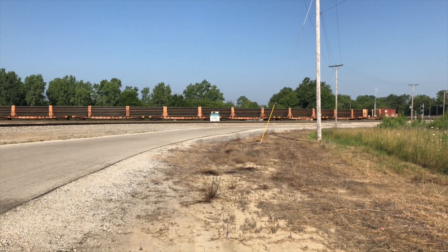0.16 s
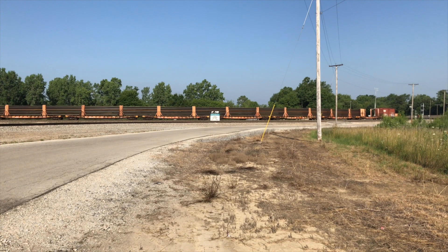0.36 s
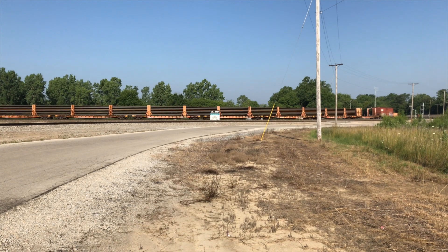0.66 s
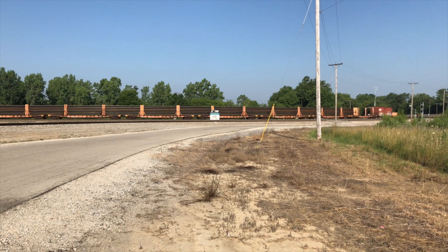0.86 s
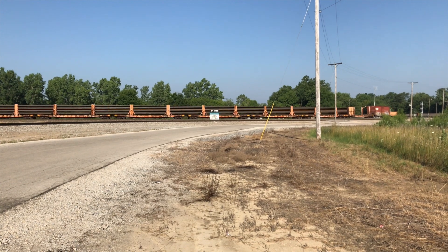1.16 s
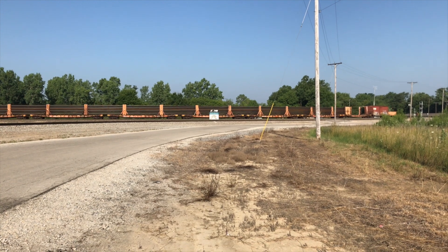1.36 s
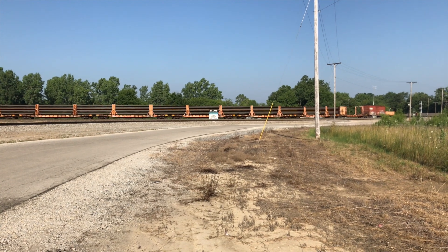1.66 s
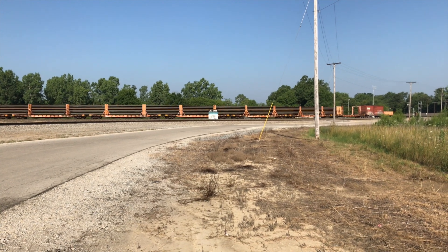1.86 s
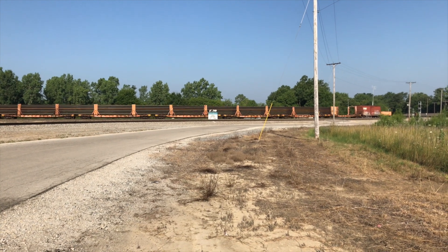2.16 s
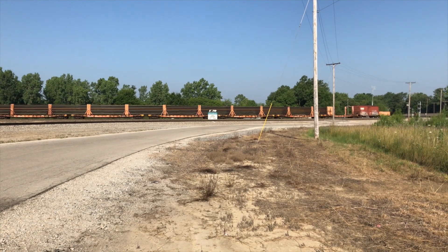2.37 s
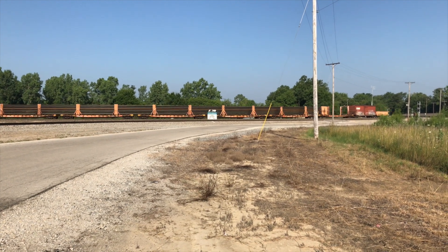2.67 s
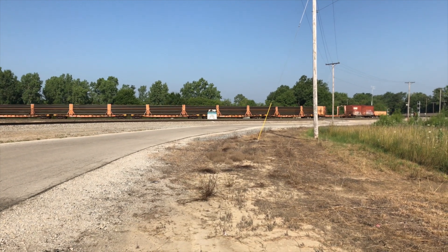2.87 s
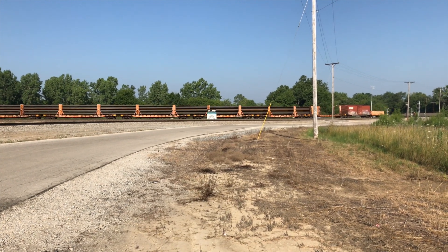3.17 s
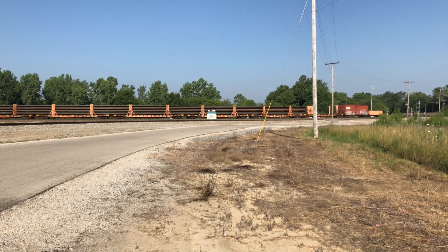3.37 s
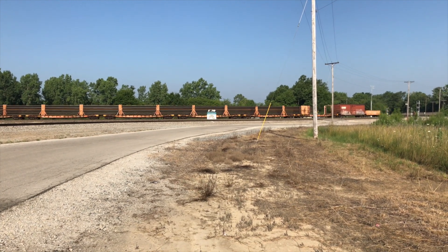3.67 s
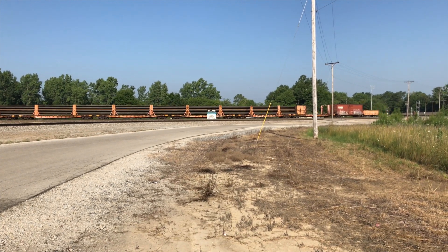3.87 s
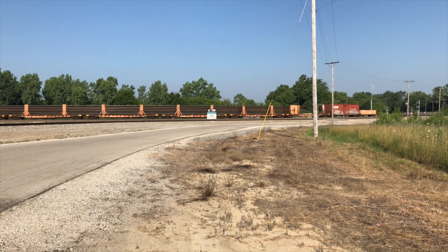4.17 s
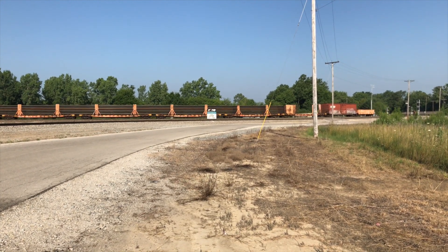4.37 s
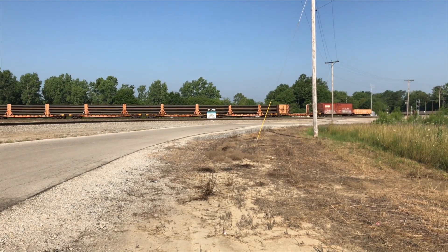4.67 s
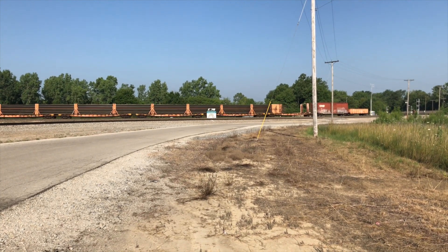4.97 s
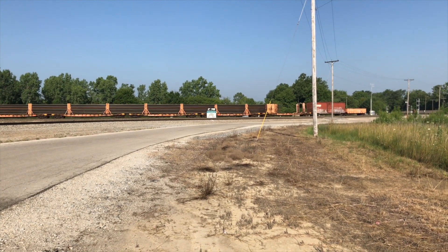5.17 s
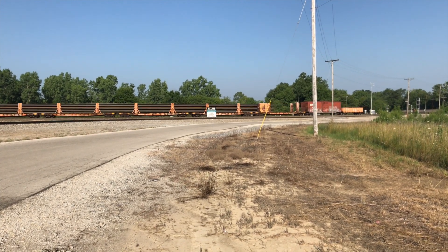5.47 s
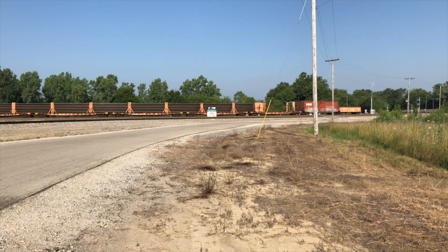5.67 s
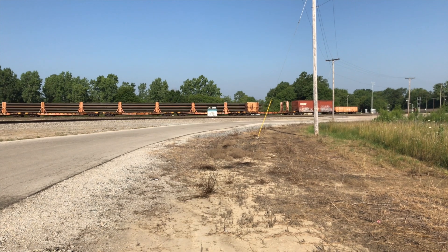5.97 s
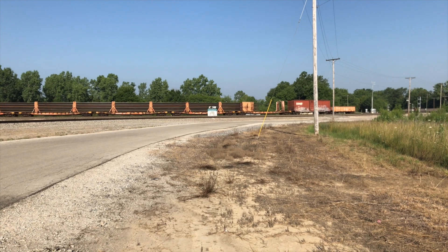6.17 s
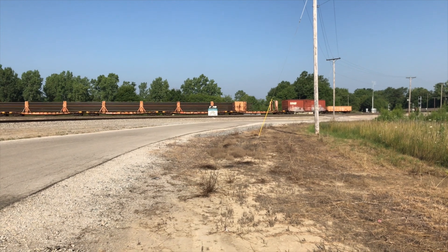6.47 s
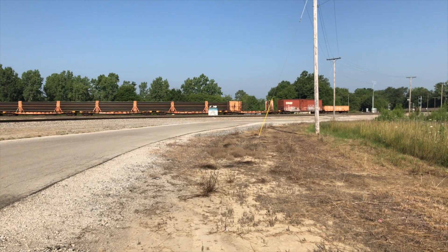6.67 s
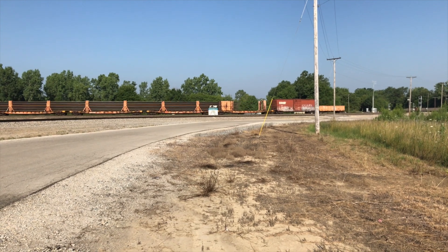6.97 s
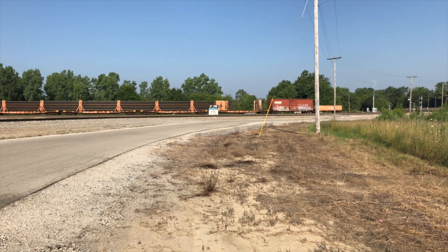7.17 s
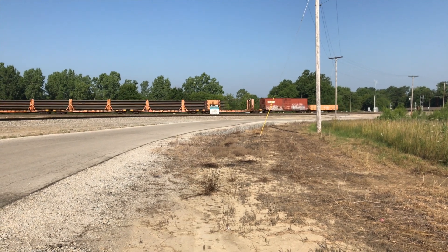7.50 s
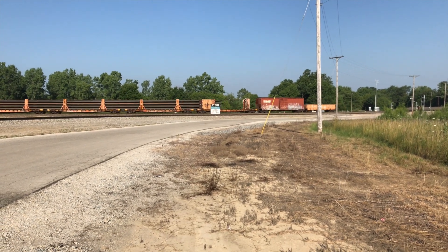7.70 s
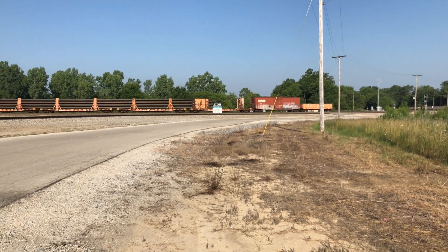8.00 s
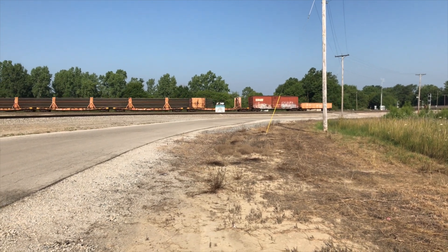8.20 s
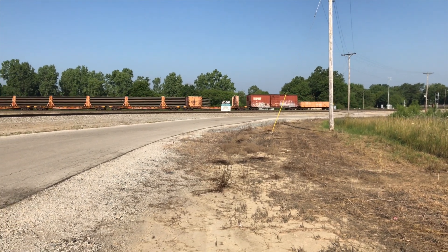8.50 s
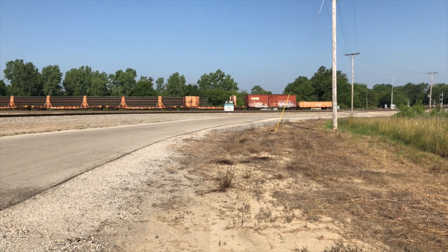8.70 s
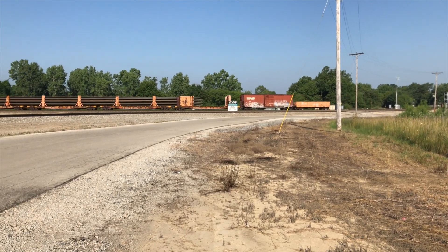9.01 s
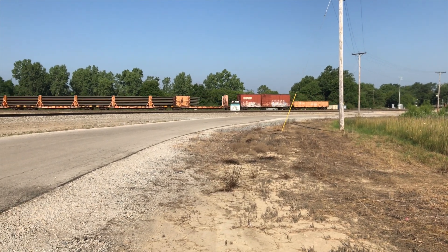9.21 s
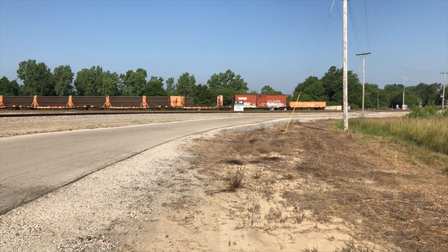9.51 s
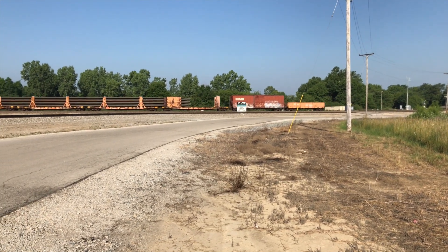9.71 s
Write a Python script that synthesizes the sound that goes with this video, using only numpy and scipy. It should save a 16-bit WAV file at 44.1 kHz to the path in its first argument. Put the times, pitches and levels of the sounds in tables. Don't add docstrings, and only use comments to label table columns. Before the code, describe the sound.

Outdoors beside a road, a phone hears a long freight train some hundred metres away. A steady deep rumble underlies a bright rubbing hiss. Chattering creaks open the scene, then a short multi-note shriek, then long pure wheel squeals near two, three and five kilohertz that swell, slip and overlap, growing strongest late. The sound is the same on both sides, with little echo.

```python
import sys
import numpy as np
from scipy import signal
from scipy.fft import rfft, irfft, next_fast_len
from scipy.io import wavfile
from scipy.ndimage import uniform_filter1d

SR = 44100
rng = np.random.default_rng(int(sys.argv[2]) if len(sys.argv) > 2 else 0)


def volts_from_db(level):
    exponent = np.asarray(level, float) / 20
    return 10 ** exponent


def dump_mix(stems):
    frames = np.atleast_2d(stems).T
    limited = np.clip(frames, -1, 1)
    pcm = np.round(limited * 32767).astype(np.int16)
    wavfile.write(sys.argv[1], SR, pcm)


N = 434371
STEP = 64

# time_s, level_db
ROLL_LOAD = [(0, -35.5), (1.2, -33.5), (3, -34.5), (4.5, -35.5), (6.2, -35), (8, -36), (9.85, -37.5)]
# pitch_hz, level_db (per Hz)
RUMBLE_COLOUR = [(12, -51), (20, -27.5), (69, -1), (87, 2.5), (218, -14), (375, -31.5), (434, -27),
                 (471, -29), (686, -29), (808, -40.5), (1000, -25.5), (1300, -63), (2200, -120)]
BOGIE_HZ, BOGIE_DB, BOGIE_S, BOGIE_SPREAD_S = 278, 5.5, 9.5, 2.3

# time_s, rub_db, scrape_db
RUB = [(0.0, -33, -46), (.74, -33.5, -44), (1.23, -39, -44), (1.53, -41.5, -43), (1.75, -38.5, -40),
       (2.14, -35, -42.5), (2.6, -38, -39), (3.1, -39, -38.5), (3.81, -43, -34.5), (4.65, -39.5, -36),
       (4.94, -43, -35), (5.51, -40, -34.5), (6.28, -40.5, -32.5), (8.89, -51.5, -32.5), (9.19, -56, -31.5),
       (9.85, -50, -32)]
RUB_HZ = [1400, 3500, 10000]
RUB_SHARE = [0.51, 0.85, 0.15]
RUB_DRIFT = [0.3, 0.55, 0.22]
# pitch_hz, level_db (per Hz)
HISS_COLOUR = [(700, -36), (1100, -29.5), (1790, -21.5), (2400, -19), (3400, -23), (4600, -23), (6500, -24),
               (10200, -26.5), (12500, -33), (15600, -41)]
# pitch_hz, width_hz, level_db (per Hz), growth_db (per s)
WHEEL_MODES = [(1107, 64, -29, -1), (1304, 54, -31.5, -1.5), (1663, 110, -27, -0.6), (1931, 40, -13.5, .3),
               (1988, 54, -10, 0.35), (2045, 65, -17, 0.5), (2240, 63, -23, -2.5), (2958, 64, -11, 0),
               (3156, 130, -17.5, -1), (3475, 115, -24.5, -1.1), (3952, 170, -19, -0.3),
               (5106, 214, -15, 1), (6910, 200, -26.5, -0.1), (7940, 160, -27, 0.7), (8780, 200, -26, 0),
               (9440, 200, -24, 0.6), (11020, 520, -28, 0), (11570, 134, -20, 0.65),
               (12000, 270, -27.5, -1), (13050, 700, -29.5, -0.6), (14300, 800, -36, 0),
               (15300, 250, -40, -1), (15500, 500, -37, 0)]
# time_s, change_db
TRIO_RUB = [(0, -2), (1.4, -7), (3, 0), (8.85, 0), (9.15, -9)]
# pitch_hz, width_hz, level_db (per Hz)
FLANGE_MODES = [(5388, 270, -16), (5435, 90, -17), (5740, 120, -20), (5600, 70, -21), (5930, 90, -18),
                (6176, 116, -23)]
HISS_DB, WHEEL_DB, FLANGE_DB = -38, -35.5, -38.5
BOUT_HISS_DB = 2

# pitch_hz, scatter_hz
CHATTER_HZ = [(2163, 13), (2256, 7), (1980, 12)]
# start_s, length_s, level_db
CHATTER = [
    [(0.0, 0.025, -32.5), (.07, 0.033, -32.5), (.17, 0.081, -37), (.24, 0.14, -39), (.34, 0.016, -24.5),
     (.4, .06, -36), (.46, 0.058, -40), (.56, 0.056, -34), (.657, 0.041, -28), (.7, 0.033, -26),
     (.745, 0.07, -34), (.83, 0.048, -33), (.875, 0.069, -30.5), (.97, 0.044, -34), (1.04, 0.048, -37),
     (1.17, .1, -50)],
    [(3.02, 0.025, -30), (3.065, 0.048, -34), (3.11, 0.032, -34.5), (3.28, 0.068, -35), (3.39, 0.032, -31),
     (3.435, .055, -35), (3.515, 0.04, -35), (3.575, .025, -34), (3.62, 0.05, -33), (3.665, .04, -34),
     (3.8, 0.055, -44), (3.91, .06, -41)],
    [(9.66, 0.013, -34), (9.7, 0.016, -38), (9.76, 0.027, -28.5), (9.815, 0.021, -25.5)],
]
# start_s, length_s, pitch_hz, level_db
CREAKS = [(.29, .03, 2240, -37), (.315, .03, 2290, -31), (.42, .12, 2935, -41), (1.15, .08, 3210, -43),
          (.53, .07, 1290, -46), (1.6, .06, 1660, -46), (1.72, .1, 500, -53), (2.7, .06, 3110, -45),
          (3.221, .024, 3105, -25.5), (3.255, .04, 3104, -28.5), (3.305, .04, 3104, -40),
          (9.59, .03, 3480, -44), (9.6, .03, 2600, -48), (.035, .03, 2310, -40), (.12, .025, 2300, -41),
          (.205, .02, 2260, -38), (.55, .03, 2250, -40), (1.06, .04, 2260, -39), (1.14, .03, 2260, -40),
          (1.24, .03, 2110, -39), (1.24, .05, 3925, -39), (4.25, .1, 3610, -49), (4.08, .14, 3550, -48),
          (4.25, .15, 3480, -49), (2.03, .05, 3530, -46), (8.9, .72, 440, -53), (2.15, .05, 3190, -44),
          (5.97, .32, 2250, -42), (7.23, .05, 1520, -46), (6.68, .05, 1700, -48), (6.67, .03, 1610, -48),
          (5.53, .05, 2860, -42), (4.7, .07, 1815, -41), (4.84, .05, 1830, -42), (5.73, .04, 5840, -38),
          (6.17, .06, 1815, -45)]
SAG_PER_S = .012

# start_s, length_s, pitch_hz, level_db
CRIES = [(0, 1.0, 3910, -48), (2.2, .5, 3950, -49), (2.6, 1.6, 3985, -48), (4.9, .7, 3950, -50),
         (0, .35, 2960, -45), (3.8, .9, 6880, -50), (3.1, .25, 9250, -48), (5.0, 1.4, 9480, -49),
         (6.3, .7, 9570, -48), (3.4, 2.0, 10900, -51), (4.1, 1.2, 12180, -50), (7.2, .7, 3975, -50),
         (2.04, .34, 7810, -40), (5.3, 1.2, 1935, -46), (4.4, .8, 1915, -47), (1.58, .2, 6010, -47),
         (2.45, .14, 5550, -45), (.23, .26, 7311, -49), (.84, .39, 9445, -50), (.88, .23, 11155, -49),
         (1.1, .8, 3895, -49), (2.79, .28, 9489, -46), (3.0, .42, 8784, -46), (3.0, .53, 12129, -52),
         (4.2, .5, 13350, -57), (4.71, .7, 2851, -49), (4.9, .55, 14450, -60), (5.32, .28, 6841, -41),
         (5.41, .3, 6900, -42), (5.7, .25, 6780, -47), (7.05, .7, 1700, -53), (6.2, .6, 6889, -42),
         (6.7, .9, 5990, -47), (7.59, 1.11, 9498, -47), (7.8, .55, 14310, -54), (6.6, .4, 14360, -56),
         (7.6, .7, 15300, -60), (8.13, .46, 1700, -53), (8.48, .39, 11146, -50), (8.66, 1.07, 1670, -55),
         (8.8, .85, 9291, -42), (9.3, .35, 3870, -51), (9.62, .35, 3860, -46), (8.5, .5, 3910, -51),
         (8.05, .38, 5910, -43), (7.25, .2, 5920, -44), (8.4, .12, 5790, -45), (9.02, .1, 5660, -44),
         (9.68, .12, 5620, -43), (4.5, .2, 6150, -48), (8.94, .44, 11997, -52), (9.17, .44, 10639, -54),
         (9.17, .7, 9525, -45),
         (1.75, .7, 8795, -47), (2.45, .4, 7800, -47), (2.68, .36, 8790, -44), (2.85, .25, 9700, -46),
             (4.0, .5, 9650, -51), (5.05, .9, 6800, -49), (5.1, .3, 6910, -47), (5.4, .8, 9630, -50),
             (5.52, .12, 8260, -47), (5.64, .14, 8880, -45), (6.2, .7, 9400, -48), (6.68, .35, 8890, -44),
             (7.75, .6, 7960, -49), (8.05, .5, 9500, -47), (7.1, .5, 6880, -50), (9.3, .5, 7100, -52),
             (6.4, .12, 5420, -40), (7.85, .15, 5440, -40)]
UPPER_HZ = [5951, 7753, 8770, 12315]
# start_s, length_s, level_db
UPPER_CRIES = [
    [(5.13, 0.44, -42), (6.05, 0.28, -44), (7.0, .3, -49)],
    [(1.83, 2.4, -53), (4.1, 0.59, -46), (4.5, .45, -41), (5.36, 0.46, -44), (5.66, .6, -40),
     (6.2, 0.4, -42), (7.76, 0.56, -49), (8.48, 0.44, -44)],
    [(3.74, 0.41, -45), (4.64, 0.34, -46), (5.06, 0.67, -41.5), (5.76, 0.92, -40.5), (7.48, 0.28, -45),
     (8.45, 0.74, -45)],
    [(4.85, 0.67, -52), (7.27, .51, -46), (8.45, 0.83, -49)],
]
SHRIEK_HZ = [5383, 6283, 7270, 8085, 8288, 8797, 9100, 9703, 9973, 10306, 10922, 11189, 12134]
SHRIEK_DB = [-55, -45, -52, -50, -46, -43, -44, -41, -42, -47, -41, -37, -43]
# start_s, length_s, level_db, tilt_db (per kHz)
BOUTS = [
    (1.68, 0.37, -2, -0.27),
    (2.029, 0.27, -9, -1.3),
    (2.72, 0.37, -7.5, -0.97),
]
SINK_PER_S, NEAR_SINK_PER_S = 0.00207, .0026

# time_s, low_hz, middle_hz, high_hz
SINGING_PITCH = [(0, 1997, 5168, 11805), (2.5, 2002, 5171, 11773), (4.5, 1999, 5166, 11708),
                 (6.5, 1993, 5154, 11663), (8.5, 1986, 5140, 11586), (9.85, 1982, 5128, 11550)]
# time_s, level_db
LOW_SING = [(0.0, -48), (.72, -37.5), (1.45, -58), (1.62, -37.5), (2.3, -37), (2.66, -28.5), (3.55, -34.5),
            (3.93, -30.5), (4.85, -31.5), (5.5, -33), (6.7, -29), (7.37, -36), (7.395, -25.5), (8.04, -21),
            (8.42, -25.5), (9.28, -20.5), (9.62, -24), (9.66, -38)]
# time_s, loss_db
SLIPS = [(3.28, 8.6), (3.72, 6.9), (4.32, 7.1), (4.45, 5.1), (5.22, 4.3), (5.32, 8.6), (5.45, 15),
         (5.66, 2.8), (6.12, 5.8), (6.2, 5.2), (6.43, 2.2), (6.83, 2), (7.24, 6), (8.89, 2.1), (9.575, 2.8),
         (.52, 6), (2.08, 6.1), (3.06, 2.3), (6.65, 2.5), (7.7, 3)]
SLIP_S = 0.055
# start_s, length_s, level_db
MIDDLE_GRIPS = [(0.145, 0.22, -37), (.92, 0.45, -43), (1.638, 0.37, -34), (2.005, 0.5, -35),
                (2.594, 0.33, -39.5), (3.04, 0.6, -32.5), (3.66, 0.39, -33.5), (4.05, .17, -31),
                (4.3, .12, -32), (4.36, .13, -29.5), (4.515, 0.12, -28.5), (4.713, 0.24, -35),
                (4.99, 0.78, -34), (5.85, 0.24, -36), (6.05, 0.3, -30.5), (6.385, 0.45, -34),
                (6.647, 0.49, -31), (7.193, 0.46, -34.5), (7.785, 0.19, -26.5), (8.021, 0.24, -29.5),
                (8.304, 0.24, -27), (8.562, 0.47, -35.5), (9.003, 0.23, -28.5), (9.266, 0.27, -27.5),
                (9.633, 0.22, -30)]
# start_s, length_s, level_db
HIGH_GRIPS = [(.69, .05, -42), (.92, .13, -41), (1.08, .5, -45), (1.74, .24, -40), (2.08, .2, -45),
              (2.6, .5, -55), (3.2, .3, -46), (3.55, .3, -45), (3.87, 0.13, -38), (3.99, 0.096, -34),
              (4.27, 0.19, -41), (4.46, .24, -42.5), (4.75, .08, -34), (4.88, .24, -44), (5.3, .3, -50),
              (5.95, 0.15, -39), (6.1, .14, -55), (6.6, 0.14, -43), (6.84, .2, -44), (7.17, 0.092, -42),
              (7.25, .1, -38), (7.4, .14, -50), (7.62, 0.18, -51.5), (7.86, 0.16, -46), (8.22, .3, -48),
              (8.7, .07, -40), (8.78, .2, -36.5), (8.99, .1, -36), (9.15, .13, -38), (9.46, .12, -40),
              (9.66, 0.22, -41.5)]
# start_s, length_s, level_db
LEAVING_GRIPS = [
    (-.1, 0.49, -43.5),
    (0.417, 0.51, -39),
]
LEAVING_HZ = 5040
BUILD_S, LET_GO_S, HIGH_EDGE_S = 0.2, 0.24, .05
HUM_DB = -11

TRIO_HZ = [2909.5, 2894.5, 2940.5]
# start_s, length_s, level_db
TRIO_GRIPS = [
    [(2.62, 0.51, -38.5), (3.31, 0.48, -32), (3.74, 0.25, -29), (4.1, 0.16, -29.5), (4.3, 0.44, -34.5),
     (4.8, 0.5, -31.5), (5.62, 0.43, -35.5), (6.22, 0.43, -33.5), (6.82, 0.44, -35.5), (7.4, 0.38, -36.5),
     (7.72, .33, -38)],
    [(5.95, .75, -34), (6.7, 0.35, -36.5), (7.55, 0.52, -37.5), (8.0, 0.47, -37.5)],
    [(7.08, 0.63, -37.5), (7.95, 0.48, -41.5), (8.6, 0.39, -34)],
]


def curves(table, t):
    s, *columns = np.transpose(table)
    return [np.interp(t, s, column) for column in columns]


def walk(rate, size, per_s=SR):
    hold = max(int(per_s / rate), 1)
    steps = np.repeat(rng.standard_normal(size // hold + 1), hold)
    return 1.3 * uniform_filter1d(uniform_filter1d(steps, hold), hold)[:size]


def tone(hz, rough, rate, wander_hz):
    size = len(hz)
    wandering = hz + wander_hz * walk(12, size)
    phase = 2 * np.pi * (np.cumsum(wandering) / SR + rng.random())
    share = np.clip(rough, 0, 1)
    flutter = walk(rate, size) * np.sin(phase) + walk(rate, size) * np.cos(phase)
    return np.sqrt(2 - 2 * share) * np.sin(phase) + np.sqrt(share) * flutter


def bands(gain, centres):
    size = next_fast_len(N)
    hz = np.arange(1, size // 2 + 2) * SR / size
    spectrum = rfft(rng.standard_normal(size)) * gain(hz)
    spectrum /= np.std(irfft(spectrum, size))
    place = np.interp(np.log(hz), np.log(centres), np.arange(len(centres)))
    return [irfft(spectrum * np.clip(1 - abs(place - k), 0, 1), size)[:N] for k in range(len(centres))]


def colour(points, hz):
    point_hz, db = np.transpose(points)
    return volts_from_db(np.interp(np.log(hz), np.log(point_hz), db))


def peak(hz, centre_hz, width_hz, db):
    return volts_from_db(db) ** 2 / (1 + (2 * (hz - centre_hz) / width_hz) ** 4)


def drifting(band, db, slow_db, slow_rate, quick_db, quick_rate):
    drift = slow_db * walk(slow_rate, len(db), SR / STEP)
    flicker = quick_db * walk(quick_rate, len(db), SR / STEP)
    return band * np.repeat(volts_from_db(db + drift + flicker), STEP)[:N]


def grip(t, rows, build_s=BUILD_S, let_go_s=LET_GO_S):
    slow, gain = t[::STEP], 0
    for start, length, db in rows:
        since, left = slow - start, start + length - slow
        edge = np.minimum(since / build_s + 0.41, left / let_go_s + 0.52)
        held = np.sin(np.pi / 2 * np.clip(edge, 0, 1)) ** 2
        hum = volts_from_db(HUM_DB) * np.clip(1 + 4 * np.minimum(since, left), 0, 1)
        gain = np.maximum(gain, volts_from_db(db) * np.maximum(held, hum))
    return np.interp(t, slow, gain)


def sunk(hz, s):
    return hz * (1 - NEAR_SINK_PER_S * (s - 6))


def cries(t, table, rough):
    out = np.zeros(N)
    for start, length, hz, db in table:
        on = slice(int(start * SR), int((start + length) * SR))
        slide = hz * (1 - SINK_PER_S * (t[on] - start - length / 2))
        swell = signal.windows.tukey(len(slide), .55)
        out[on] += swell * volts_from_db(db) * tone(slide, rough, rate=45, wander_hz=0.0011 * hz)
    return out


def rumble(t):
    slow = t[::STEP]
    centres = np.geomspace(30, 1000, num=10)
    db, = curves(ROLL_LOAD, slow)
    out = 0
    for hz, band in zip(centres, bands(lambda f: colour(RUMBLE_COLOUR, f), centres)):
        follow = np.clip(110 / hz, 0, 1)
        pitch_gap = np.log(hz / BOGIE_HZ) ** 2 / 0.14
        time_gap = ((slow - BOGIE_S) / BOGIE_SPREAD_S) ** 2
        near_db = BOGIE_DB * np.exp(-pitch_gap - time_gap)
        out = out + drifting(band, db.mean() + follow * (db - db.mean()) + near_db, .5, .8, .5, 4)
    return out


def crowd(t, gain, scrape_db, count):
    when, long, where, size = rng.random((count, 4)).T
    hz = np.where(np.arange(count) % 2, 5280 + 950 * where ** 1.5, 6500 + 9000 * where)
    start = when * (t[-1] - .1)
    scrape = scrape_db[(start * SR / STEP).astype(int)]
    db = 20 * np.log10(gain(hz)) + (scrape - 6) * (hz < 6400) + 5 * size - 31
    return cries(t, zip(start, .08 + .3 * long ** 2, hz, db), rough=.85)


def friction(t):
    slow = t[::STEP]
    middle = slow - slow.mean()
    rub_db, scrape_db = (db - db.mean() for db in curves(RUB, slow))
    change = [share * rub_db + drift * middle for share, drift in zip(RUB_SHARE, RUB_DRIFT)]
    bouts = sum(np.exp(-(2 * (slow - start) / length - 1) ** 2) for start, length, *_ in BOUTS)
    change[-1] += BOUT_HISS_DB * bouts

    def wheels(hz):
        return sum(peak(hz, *mode[:3]) for mode in WHEEL_MODES)

    def flange(hz):
        return sum(peak(hz, *mode) for mode in FLANGE_MODES)

    centres = np.geomspace(900, 15000, num=13)
    out, shared = 0, walk(12, len(slow), SR / STEP)
    for hz, band in zip(centres, bands(lambda f: colour(HISS_COLOUR, f), centres)):
        share = [np.interp(np.log(hz), np.log(RUB_HZ), row) for row in np.eye(len(RUB_HZ))]
        db = HISS_DB + share @ np.array(change) + 0.3 * np.clip(hz / 9000, 0, 1) * shared
        out = out + drifting(band, db, .5, 2, 1.7, 32)
    trio_db, = curves(TRIO_RUB, slow)
    wheel_bands = bands(lambda f: np.sqrt(wheels(f)), [mode[0] for mode in WHEEL_MODES])
    for band, (hz, _, _, growth_db) in zip(wheel_bands, WHEEL_MODES):
        db = WHEEL_DB + growth_db * middle + (2700 < hz < 3350) * trio_db
        out = out + drifting(band, db, 1.0, 1.5, 2.2, 30)
    for band in bands(lambda f: np.sqrt(flange(f)), [mode[0] for mode in FLANGE_MODES]):
        out = out + drifting(band, FLANGE_DB + scrape_db, 1.5, 4, 1.8, 22)

    def whole(hz):
        return np.sqrt(colour(HISS_COLOUR, hz) ** 2 + wheels(hz) + flange(hz))
    return out + crowd(t, whole, scrape_db, count=320)


def creaks(t):
    out = np.zeros(N)
    jerks = [(start, length, hz + scatter * rng.standard_normal(), db)
             for rows, (hz, scatter) in zip(CHATTER, CHATTER_HZ) for start, length, db in rows]
    for start, length, hz, db in jerks + CREAKS:
        on = slice(max(int(start * SR), 0), int((start + length + .08) * SR))
        age = t[on] - start
        onset = np.clip(age / .008, 0, 1)
        tail = np.exp(-np.clip(age - length, 0, 1) / .01 - .4 * age / length)
        pitch = hz * (1 - SAG_PER_S * (age - length / 2))
        out[on] += onset * tail * volts_from_db(db) * tone(pitch, rough=.14, rate=150, wander_hz=.003 * hz)
    return out


def wheel_cries(t):
    upper = [(start, length, sunk(hz, start + length / 2), db)
             for hz, rows in zip(UPPER_HZ, UPPER_CRIES) for start, length, db in rows]
    shriek = []
    for start, length, bout_db, tilt_db in BOUTS:
        for hz, note_db in zip(SHRIEK_HZ, SHRIEK_DB):
            db = note_db + 2 * rng.standard_normal() + bout_db + tilt_db * (hz - 9000) / 1000
            shriek.append((start + .04 * rng.random(), length * rng.uniform(.75, 1.1), hz, db))
    return cries(t, CRIES + shriek, rough=0.83) + cries(t, upper, rough=0.44)


def singing(t):
    low_db, = curves(LOW_SING, t)
    low_db = low_db - sum(db * np.exp(-((t - s) / SLIP_S) ** 2) for s, db in SLIPS)
    low_hz, middle_hz, high_hz = curves(SINGING_PITCH, t)
    low_rough = .04 + .2 * np.clip((-27 - low_db) / 10, 0, 2)
    out = volts_from_db(low_db) * tone(low_hz, low_rough, rate=120, wander_hz=1.5)
    out += grip(t, MIDDLE_GRIPS) * tone(middle_hz, rough=0.06, rate=70, wander_hz=2.7)
    early = t[t < 1.3]
    leaving = tone(LEAVING_HZ + 0 * early, rough=.15, rate=50, wander_hz=3)
    out[:len(early)] += grip(early, LEAVING_GRIPS) * leaving
    high = tone(high_hz, rough=0.15, rate=70, wander_hz=9)
    return out + grip(t, HIGH_GRIPS, HIGH_EDGE_S, HIGH_EDGE_S) * high


def trio(t):
    out = np.zeros(N)
    for rows, hz in zip(TRIO_GRIPS, TRIO_HZ):
        first_s, last_s = rows[0][0] - .3, sum(rows[-1][:2]) + .3
        on = slice(int(first_s * SR), int(last_s * SR))
        out[on] += grip(t[on], rows) * tone(sunk(hz, t[on]), rough=.11, rate=150, wander_hz=1.5)
    return out


def masked(x):
    low_hz, high_hz = 10800, 12250
    band_bins = 32
    hz, _, z = signal.stft(x, SR, window="cosine", nperseg=2048)
    power = abs(z) ** 2
    loudest = power[(hz > low_hz) & (hz < high_hz)].max(axis=0)
    masker = uniform_filter1d(loudest, size=3)
    band = np.arange(len(hz)) // band_bins
    scatter_db = 4 * rng.standard_normal((band[-1] + 1, z.shape[1]))[band]
    slope_db = -1.7 * (hz[band * band_bins, None] - high_hz) / 1000
    limit = volts_from_db(-25 + slope_db + scatter_db) ** 2 * masker
    hidden = (uniform_filter1d(power, size=3, axis=0) < limit) & (hz > high_hz)[:, None]
    return signal.istft(z * ~hidden, SR, window="cosine", nperseg=2048)[1][:N]


def scene():
    t = np.arange(N) / SR
    mono = rumble(t) + friction(t) + creaks(t) + wheel_cries(t) + singing(t) + trio(t)
    return np.array([mono, mono])


def band_limit(x):
    return signal.sosfilt(signal.butter(12, 15730, fs=SR, output="sos"), x)


def record(dry):
    mono = masked(dry[0])
    return band_limit(np.array([mono, mono]))


dry = scene()
out = record(dry)
dump_mix(out)
```